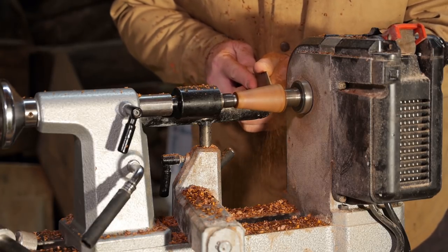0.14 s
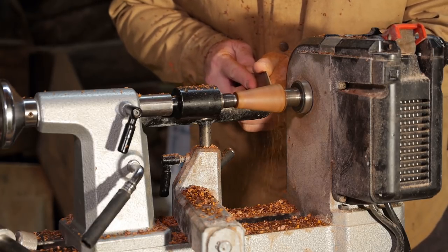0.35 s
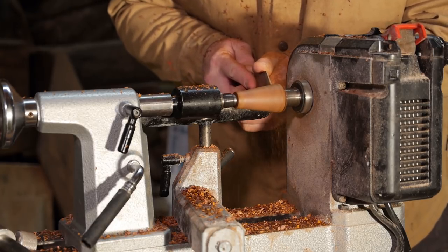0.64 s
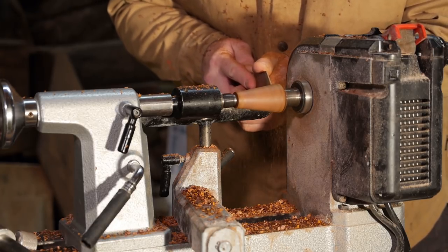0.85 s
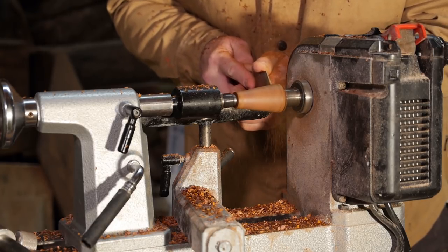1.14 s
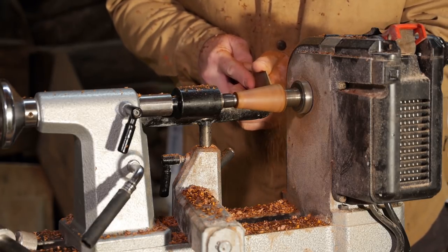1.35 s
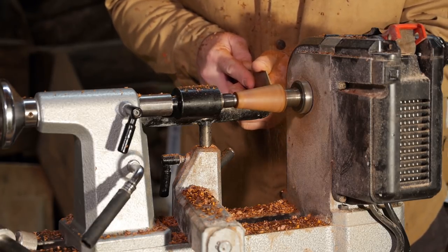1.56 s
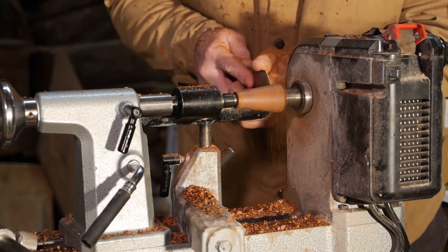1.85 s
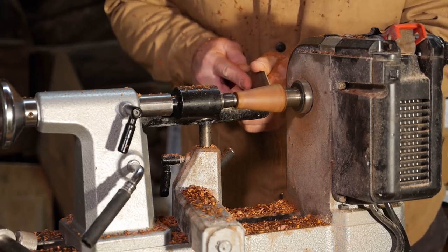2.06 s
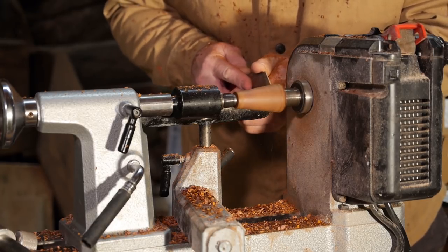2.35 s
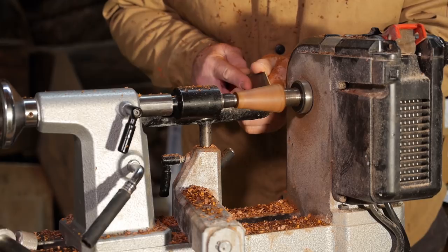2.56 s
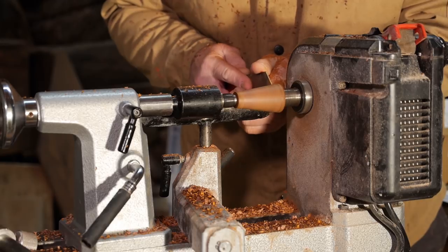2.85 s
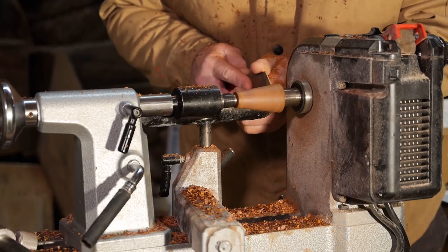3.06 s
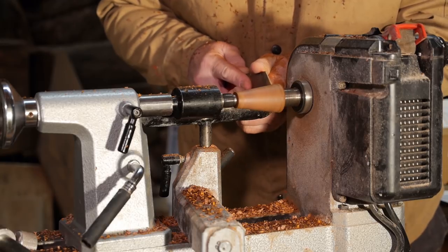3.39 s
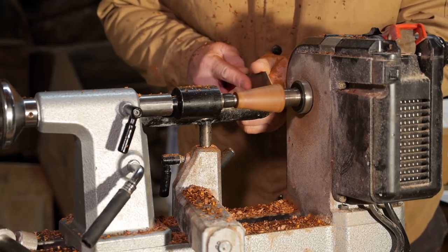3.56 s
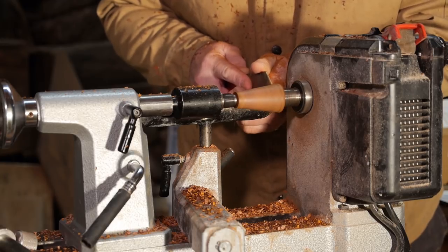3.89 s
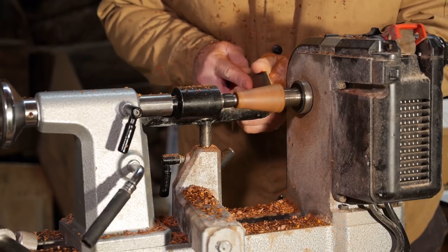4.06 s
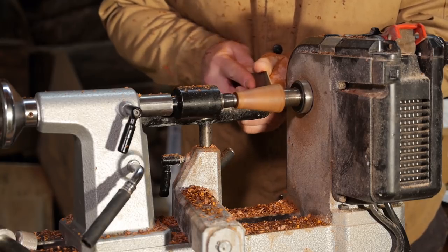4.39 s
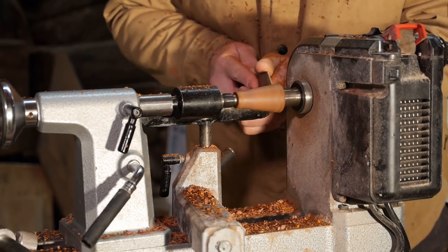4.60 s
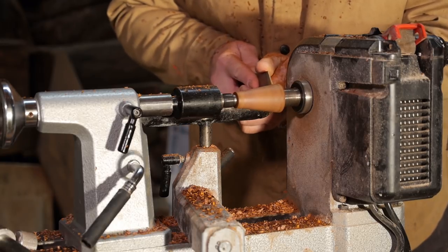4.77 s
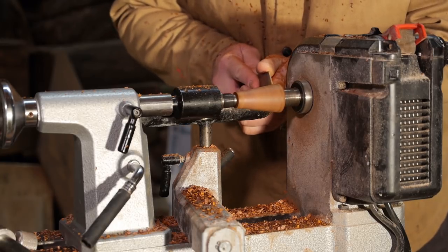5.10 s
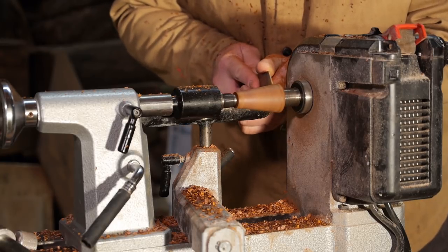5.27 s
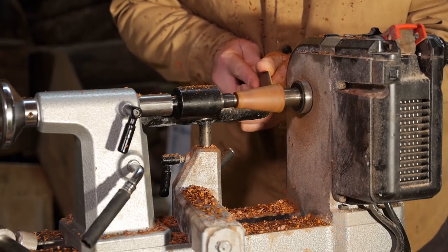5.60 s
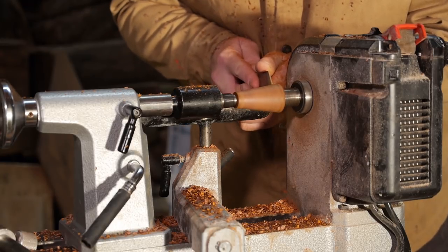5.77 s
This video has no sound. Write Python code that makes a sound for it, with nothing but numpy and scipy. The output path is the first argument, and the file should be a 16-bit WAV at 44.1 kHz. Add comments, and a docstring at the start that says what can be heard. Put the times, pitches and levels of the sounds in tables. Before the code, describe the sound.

A small wood lathe whirrs steadily in a workshop. A hand-held tool presses into the spinning wood with a buzzing, rattling chatter and two faint high squeals. It backs off, then returns in short scraping touches with sharp clicks as chips tear out. Finally it settles into a smooth, droning cut with a light hiss of shavings. The sound is close, with little room echo.

```python
"""Turning wood on a lathe

A small lathe spins a blank about 34 times a second in a workshop while a hand-held tool cuts it.
A heavy first cut loads the spindle and chatters; the tool backs off, catches on the high spot in short
touches, then settles into a smooth last cut. Each turn replays almost the same wood surface under the
edge, and the cutting forces excite the resonances of tool, rest and blank over the whirr of the motor."""
import sys
import numpy as np
from scipy import signal
from scipy.fft import rfft, irfft, next_fast_len
from scipy.io import wavfile
from scipy.ndimage import map_coordinates

SR = 44100
rng = np.random.default_rng(int(sys.argv[2]) if len(sys.argv) > 2 else 0)


def log_audio(samples):
    """Write samples as a 16-bit WAV file to the path given in sys.argv[1]."""
    # one column per channel
    frames = np.atleast_2d(samples).T
    # limit to full scale, then quantise
    limited = np.clip(frames, -1, 1)
    pcm = np.round(limited * 32767).astype(np.int16)
    wavfile.write(sys.argv[1], SR, pcm)


N = 261954

# Spindle speed. Each row: time in seconds, turns per second.
SPINDLE_SPEED = [(0, 33.26), (0.85, 33.39), (1.4, 33.11), (1.93, 33.31), (2.1, 34.71), (2.55, 35.56),
                 (2.78, 34.37), (3.15, 35.72), (3.58, 34.57), (3.8, 35.38), (4.02, 34.36), (4.35, 36.18),
                 (4.55, 34.93), (4.85, 34.73), (5.15, 35.29), (5.45, 34.56), (5.94, 34.04)]
# Reverberation of the workshop. Each row: frequency in Hz, seconds to decay by 60 dB.
ROOM_DECAY = [(200, 0.067), (2000, 0.3), (6000, 0.19), (14000, 0.062)]
# Modes of tool, rest and blank. Each row: frequency in Hz, width in Hz, relative lift in dB.
RESONANCES = [(700, 130, 8), (915, 60, 6), (1160, 150, 8), (1662, 55, 9), (1895, 80, 6), (2010, 70, 4),
              (2430, 70, 5), (2900, 100, 8), (3335, 60, 7), (3600, 90, 4), (5160, 110, 9), (6595, 110, 11),
              (6850, 90, 10), (8300, 180, 6), (11350, 550, 5)]
# Squeals of the shank. Each row: middle in seconds, half width in seconds, level in dB.
SHANK_SQUEALS = [(.46, 0.075, -33), (1.006, .12, -33.5)]
# Light touches. Each row: start and end in seconds, then, in relative dB, final level,
# rise during the touch, thrum against scrape, hiss against scrape, extra bite at the high spot.
TOUCH_EVENTS = [(2.523, 2.69, -27.5, 6.5, -5, -10, 10), (2.896, 2.99, -35.5, 15, -8, -6, 14),
                (2.98, 3.155, -29, -2.5, -4, -9, 13.5), (3.174, 3.562, -27, 3.5, -2, -5.5, 11.5),
                (3.69, 3.893, -23, 9, 0, -9.5, 19), (3.99, 4.203, -30, 7.5, 2, -5.5, 5),
                (4.207, 4.373, -25.5, 1, -1.5, -9, 13)]
# Torn chips. Each row: time in seconds, relative level, crack share and fizz share in dB,
# decay time in seconds.
CATCH_EVENTS = [(2.367, 2, -24, -21, 0.0061), (2.398, -1, -16, -18, 0.0062),
                (2.536, -15.5, -10.5, -15, 0.0077), (2.568, -10.5, -22, -12, 0.0057),
                (2.702, -2, -20, -31, 0.007), (2.73, 1.5, -17.5, -24, 0.0044),
                (2.99, -11, -13, -25, 0.0082), (3.015, -0.5, -18.5, -27, 0.0061),
                (3.077, -10.5, -10, -26, 0.0065), (3.11, -7, -17, -36, 0.01), (3.328, -6, -13, -25, 0.0083),
                (3.559, -6, -6.5, -21, 0.0065), (3.59, -3, -16, -33, 0.0071), (3.619, 0.5, -17, -34, 0.005),
                (3.93, -0.5, -17, -31, 0.0069), (3.962, -2.5, -14.5, -30, 0.0074),
                (4.245, -7, -15, -27, 0.0062), (4.271, -7, -12, -30, 0.0097)]
# Tool pressure in the last cut. Each row: time in seconds, relative pressure in dB.
TOOL_PRESSURE = [(4.4, -26), (4.858, -23), (5.138, -24), (5.418, -21.5), (5.9, -22)]
# Lines of the heavy and the last cut. Each row: multiple of the spindle speed, relative level in dB.
CHATTER_LINES = [(4, -32), (5, -28.5), (6, -17.5), (7, -20.5), (8, -20.5), (9, 1.5), (10, -12), (11, -9.5),
                 (12, -10.5), (13, -8.5), (14, -11.5), (16, -15), (18, -11), (20, -11), (22, -13)]
DRONE_LINES = [(4, -18), (5, -14.5), (6, -17), (7, -11), (8, -9), (9, -1.5), (10, -4), (11, -6.5), (12, 2),
               (13, -1), (14, -9)]
# Spectral envelopes, or colours. Each row: frequency in Hz, relative level in dB.
MOTOR_COLOUR = [(25, -16), (45, -10), (80, -11), (140, 1.5), (220, 1), (400, 5), (560, 3), (900, 0.5),
                (1500, -5), (3400, -3.5), (5200, -14), (10000, -23), (16000, -29)]
THRUM_COLOUR = [(40, -45.5), (110, -34), (160, -13.5), (230, -13.5), (300, 7.5), (440, 1), (540, -31.5),
                (800, -23), (2000, -66)]
CATCH_KNOCK_COLOUR = [(60, -34), (150, -30), (300, 4), (450, 3), (640, -0.5), (850, -5.5), (1150, 0.5),
                      (1900, 0.5), (3000, -3), (4200, -5.5), (6000, -45), (12000, -33)]
HIGH_SPOT_COLOUR = [(480, -30), (590, -2), (670, 2), (760, 1), (840, -7), (1100, 3), (1400, -4), (1700, 0),
                    (3000, -8), (5000, -28)]
LIGHT_SCRAPE_COLOUR = [(350, -47), (580, -2), (1150, -1.5), (1450, -1), (2000, 1), (2700, 2), (3400, -0.5),
                       (4500, -3), (6000, -47), (12000, -17.5)]
LIGHT_HISS_COLOUR = [(2500, -63), (4800, 5), (5700, 2.5), (7400, 3.5), (9000, -7.5), (9700, 2.5),
                     (10400, -6), (11500, -4.5), (14000, -11), (15700, -28)]
SMOOTH_SCRAPE_COLOUR = [(350, -24), (520, -0.5), (700, -2.5), (900, -1.5), (1150, -4), (2000, 2.5),
                        (2700, 2), (3400, -1), (4500, -6), (6000, -45)]
SMOOTH_HISS_COLOUR = [(2500, -18), (4800, 2.5), (6000, -0.5), (7400, 1.5), (8800, -7.5), (10700, -2),
                      (11400, -5.5), (13400, -1.5), (15700, -17)]
HEAVY_SCRAPE_COLOUR = [(500, -84), (750, -1.5), (900, -0.5), (1200, -1.5), (1450, 0.5), (2000, 2.5),
                       (2600, 0.5), (3400, -4), (4500, -9), (6000, -51), (12000, -30)]
HEAVY_HISS_COLOUR = [(2500, -13), (4800, 1.5), (5700, 2), (8300, 2), (9200, -4.5), (10500, -5.5),
                     (11700, -1.5), (12700, -4), (15700, -5.5)]

SHANK_HZ = 3338


def amp(db):
    """Amplitude ratio of a level in decibels."""
    return 10 ** (np.asarray(db) / 20)


def rms(x):
    """Root-mean-square amplitude."""
    return np.sqrt(np.mean(x ** 2) + 1e-20)


def unit(x):
    """Normalisation to rms 1."""
    return x / rms(x)


def clock():
    """The time of each sample in seconds."""
    return np.arange(N) / SR


def along(points, hz):
    """Interpolation of (Hz, value) points on a logarithmic frequency axis."""
    freqs, values = np.transpose(points)
    return np.interp(np.log(hz + 1), np.log(freqs + 1), values)


def curve(points):
    """Linear interpolation of (seconds, value) points at every sample."""
    return np.interp(clock(), *np.transpose(points))


def wobble(rate):
    """Smooth random modulation: a spline through rate Gaussian knots a second."""
    knots = rng.standard_normal(int(N * rate / SR) + 4)
    return map_coordinates(knots, [np.arange(N) * rate / SR])


def onset(start, attack):
    """Linear rise from 0 to 1 over attack seconds."""
    return np.clip((clock() - start) / attack, 0, 1)


def release(end, db_per_s):
    """Exponential decay of contact as the edge leaves the wood."""
    return amp(-db_per_s * np.maximum(clock() - end, 0))


def swell(middle_s, half_s):
    """Gaussian envelope: 1 at the middle, 1/e at half_s to either side."""
    return np.exp(-((clock() - middle_s) / half_s) ** 2)


def split(x, kind, hz):
    """Butterworth filtering: the "low" or "high" side of hz."""
    return signal.sosfilt(signal.butter(4, hz, kind, fs=SR, output="sos"), x)


def body(x, colour, ring=1, size=8192):
    """Forced response: a minimum-phase filter of energy 1, a colour plus resonances scaled by ring."""
    hz = np.fft.rfftfreq(size, 1 / SR)
    peaks_db = sum(lift / (1 + (2 * (hz - f) / width) ** 2) for f, width, lift in RESONANCES)
    cepstrum = irfft(np.log(amp(along(colour, hz) + ring * peaks_db)))[:size // 2]
    cepstrum[0] = 0
    response = irfft(np.exp(rfft(2 * cepstrum, size)))
    return signal.fftconvolve(x, response / np.linalg.norm(response))[:N]


def surface(turns, renew_hz, steep, size=1400):
    """Quasi-periodic roughness: coarse ridges return each turn, those above renew_hz are cut away."""
    spectra = rfft(rng.standard_normal((int(turns[-1]) + 2, size)))  # one row a turn
    ridge_hz = np.arange(spectra.shape[1]) * turns[-1] * SR / N
    kept = np.exp(-(ridge_hz / renew_hz) ** steep)
    for k in range(1, len(spectra)):
        spectra[k] = kept * spectra[k - 1] + np.sqrt(1 - kept ** 2) * spectra[k]
    return unit(map_coordinates(irfft(spectra).ravel(), [turns * size], order=3))


def bite(turns, depth_db, width):
    """Runout modulates the cutting force (rms 1): it jumps at the high spot and falls over width turns."""
    angle = turns % 1
    spot = np.exp(-angle / width) + np.exp((angle - 1) / 0.032)
    depth = amp(depth_db)
    mean_square = 1 + 2 * depth * spot.mean() + depth ** 2 * np.mean(spot ** 2)
    return (1 + depth * spot) / np.sqrt(mean_square)


def bumps(turns, scatter_db=0.6):
    """An impulse train of rms 1: one push each time the high spot meets the edge."""
    pushes = np.diff(np.floor(turns), prepend=np.floor(turns[0]))
    return unit(pushes * amp(scatter_db * wobble(30)))


def harmonics(turns, lines, flutter_db, flutter_rate, jitter_rad, jitter_rate):
    """Phase locking: partials at multiples of the spindle speed waver slightly in level and phase."""
    tone = np.zeros(N)
    for multiple, db in lines:
        level = amp(db + flutter_db * wobble(flutter_rate))
        phase = 2 * np.pi * (multiple * turns + rng.random())
        tone += level * np.sin(phase + jitter_rad * wobble(jitter_rate))
    return unit(tone)


def shavings(force, colour, grain_db, ring):
    """Fracture noise: fibres snap in tiny clumps as the shaving peels off."""
    snaps = rng.standard_normal(N) * amp(grain_db * wobble(1800))
    return unit(body(snaps * force, colour, ring))


def workshop(x):
    """Diffuse reverberation: after 5 ms comes a tail in which each frequency decays at its own rate."""
    hz, t, noise = signal.stft(rng.standard_normal(SR // 2), SR, nperseg=256)
    decay = amp(-60 * t / along(ROOM_DECAY, hz)[:, None])
    tail = signal.istft(noise * decay, SR, nperseg=256)[1]
    delayed = np.pad(x, (round(0.005 * SR), 0))
    return signal.fftconvolve(delayed, tail / np.linalg.norm(tail))[:N]


def motor(turns):
    """Rotating machinery noise: motor, belt and bearings whirr, partly in step with the spindle."""
    vibration = 0.68 * surface(turns, 5400, 1) + rng.standard_normal(N)
    return amp(-36.5) * unit(body(vibration, MOTOR_COLOUR, ring=0.57))


def squeal(waver_rad=0.43):
    """Self-excited vibration: friction keeps one mode of the shank ringing; it swells and fades."""
    level = sum(amp(db) * swell(middle, half) for middle, half, db in SHANK_SQUEALS)
    tone = np.sin(2 * np.pi * SHANK_HZ * clock() + waver_rad * wobble(30.8))
    return level * unit(tone * amp(1.8 * wobble(30)))


def light_touches(turns):
    """Intermittent contact: the edge grazes the blank, mostly at its high spot, and lets go."""
    thrum, scrape, hiss = np.zeros((3, N))
    for start, end, db, rise_db, thrum_db, hiss_db, runout_db in TOUCH_EVENTS:
        lean_db = rise_db * (onset(start, end - start) - 1)
        contact = amp(db + lean_db) * onset(start, attack=0.046) * release(end, db_per_s=131)
        thrum += amp(thrum_db) * contact * bite(turns, runout_db - 10, width=0.54)
        scrape += contact * bite(turns, runout_db - 3.5, width=0.16)
        hiss += amp(hiss_db) * contact * bite(turns, runout_db, width=0.11)
    low = rms(thrum) * unit(body(thrum * surface(turns, 2800, 0.89), THRUM_COLOUR))
    rasp = rms(scrape) * unit(body(scrape * surface(turns, 2220, 3.66), LIGHT_SCRAPE_COLOUR))
    peel = rms(hiss) * shavings(hiss, LIGHT_HISS_COLOUR, grain_db=2.5, ring=0.85)
    return amp(-1.5) * low + amp(0.1) * rasp + amp(-0.7) * peel


def catches(rise_s=0.0022, lead_s=0.00078):
    """Impulsive excitation: a chip tears out in a few milliseconds and rings the tool and the rest."""
    forces = np.zeros((3, N + SR))
    t = np.arange(SR // 3) / SR
    for time_s, db, crack_db, fizz_db, decay_s in CATCH_EVENTS:
        tear = (1 - np.exp(-t / rise_s)) * np.exp(-(t / decay_s) ** 2)  # edge digs in, chip breaks
        tear /= tear.max()
        # knock, crack, fizz: the finest fibres snap only at the height of the tear
        parts = [amp(-9) * tear, amp(crack_db - 2) * tear, amp(fizz_db + 7) * tear ** 2]
        first = round((time_s - lead_s) * SR)
        forces[:, first:first + len(t)] += amp(db) * np.array(parts)
    fibres = unit(rng.standard_normal((3, N)) * amp(4.5 * wobble(1500)))
    knock_force, crack_force, fizz_force = forces[:, :N] * fibres
    shank = amp(-60 * t / 0.44) * np.sin(2 * np.pi * SHANK_HZ * t)  # the steel rings on after each blow
    ringing = amp(-25) * signal.fftconvolve(knock_force, shank / np.linalg.norm(shank))[:N]
    knock = body(knock_force, CATCH_KNOCK_COLOUR, ring=0.95)
    crack = split(body(crack_force, LIGHT_HISS_COLOUR, ring=0.85), "low", 7540)
    fizz = split(body(fizz_force, HEAVY_HISS_COLOUR), "high", 12000)
    return knock + ringing + crack + fizz


def smooth_cut(turns, start_s=4.35):
    """Forced vibration: as an even shaving peels off, the blank drones and thumps softly once a turn."""
    t, pressure_db = clock(), curve(TOOL_PRESSURE)
    tilt_db = 0.45 * (pressure_db - pressure_db[-1])  # more pressure lifts the upper lines
    middle = np.mean([k for k, db in DRONE_LINES])
    lines = [(k, db + tilt_db * max(k - middle, 0)) for k, db in DRONE_LINES]
    drone = harmonics(turns, lines, flutter_db=1.64, flutter_rate=3.6, jitter_rad=0.27, jitter_rate=6.4)
    thump = unit(body(bumps(turns) + surface(turns, 1000, 0.7), THRUM_COLOUR))
    ease_db = 7.5 * swell(middle_s=5.07, half_s=0.22)  # the high spot ticks through as the hand eases
    force = surface(turns, 7100, 0.94) * bite(turns, ease_db - 0.5, width=0.088)
    rasp = unit(body(force, SMOOTH_SCRAPE_COLOUR, ring=0.73))
    peel = shavings(bite(turns, ease_db + 1.5, width=0.04), SMOOTH_HISS_COLOUR, grain_db=2.5, ring=0.73)
    echo_delay_s = 0.00013 + 0.000013 * (t - start_s)  # reflection off the moving hand: a drifting comb
    peel = peel + 0.13 * map_coordinates(peel, [SR * (t - echo_delay_s)])
    wood = amp(pressure_db) * (amp(-4) * drone + amp(-9) * thump + amp(-0.8) * rasp)
    hiss = amp(0.87 * pressure_db - 11.5) * peel
    return onset(start_s, attack=0.12) * (wood + hiss)


def heavy_cut(turns, back_off_s=1.92, lift_s=2.345):
    """Chatter: the loaded tool vibrates about nine times a turn, knocks on the high spot and rebounds."""
    t = clock()
    # the tool holds steady, backs off to a graze, then lifts
    contact = np.maximum(release(back_off_s, db_per_s=46), amp(-12)) * release(lift_s, db_per_s=200)
    locked = 1 - onset(back_off_s, attack=0.21)  # the chatter breaks up as the tool backs off
    parting = swell(middle_s=1.986, half_s=0.044)
    runout_db = -10 + 7 * t + 12 * parting  # bite at the high spot grows, and surges as the edge parts
    tone = harmonics(turns, CHATTER_LINES, flutter_db=2.3, flutter_rate=4.27,
                     jitter_rad=0.066, jitter_rate=7.8)
    loose = unit(body(surface(turns, 1500, 0.66), THRUM_COLOUR))
    chatter = amp(-23.5 + t) * (locked * tone + (1 - 1.05 * locked) * loose)  # grows 1 dB a second
    blows = bumps(turns - 0.045) + 0.34 * bumps(turns - 0.185)  # strike and rebound
    knock = amp(-2 - 0.9 * t) * locked ** 4 * unit(body(blows, HIGH_SPOT_COLOUR))
    force = surface(turns, 4000, 1.5) * bite(turns - 0.02, runout_db + 2.5, width=0.1)
    rasp = amp(-3 + 2 * parting) * unit(body(force, HEAVY_SCRAPE_COLOUR, ring=0.78))
    peel = shavings(bite(turns, runout_db + 6, width=0.029), HEAVY_HISS_COLOUR, grain_db=2, ring=1.16)
    hiss = contact ** 0.78 * amp(-32 + 5.6 * parting) * peel
    return contact * (chatter + amp(-22) * (knock + rasp)) + hiss


def scene():
    """Superposition of tool, room and motor; cuts, touches and motor share one spindle angle."""
    turns = np.cumsum(curve(SPINDLE_SPEED)) / SR + 0.73  # whole turns put the high spot on the edge
    tearing = light_touches(turns) + catches()
    cutting = heavy_cut(turns) + squeal() + smooth_cut(turns)
    radiated = tearing + split(cutting, "high", 690)  # the small blank throws little bass into the room
    return (cutting + tearing + amp(-9) * workshop(radiated) + motor(turns))[None]


def record(dry, ceiling=0.9, top_hz=15850):
    """Soft saturation rounds off the highest peaks; band limiting removes everything above top_hz."""
    rounded = dry / (1 + abs(dry / ceiling) ** 6) ** (1 / 6)
    size = next_fast_len(N + SR // 2)
    passband = np.fft.rfftfreq(size, 1 / SR) < top_hz
    return irfft(rfft(rounded, size) * passband, size)[:, :N]


dry = scene()
out = record(dry)
log_audio(out)
```